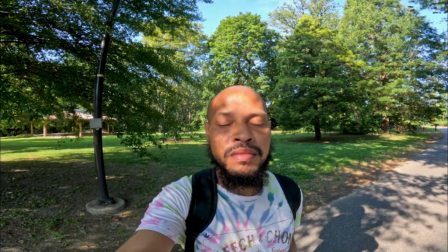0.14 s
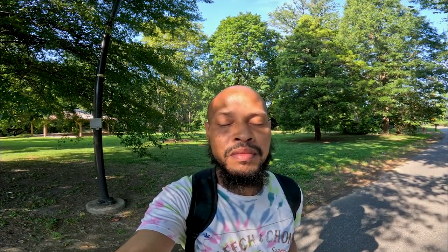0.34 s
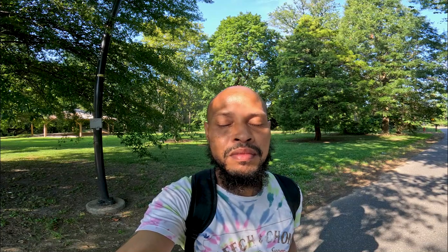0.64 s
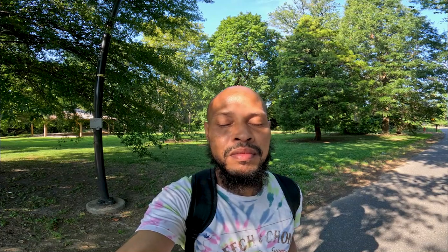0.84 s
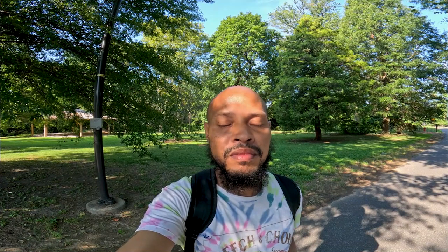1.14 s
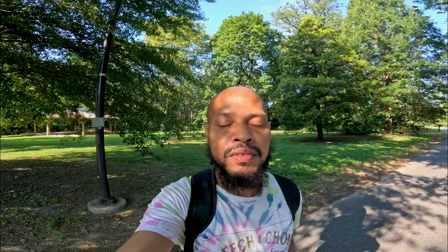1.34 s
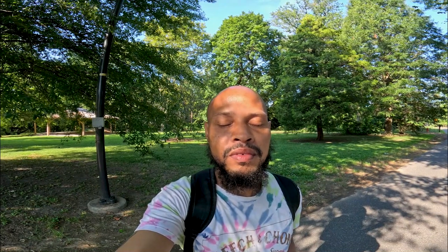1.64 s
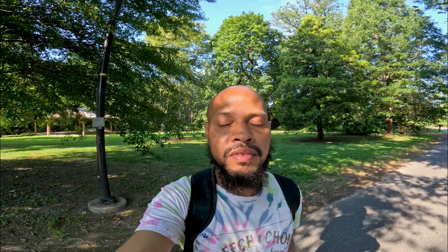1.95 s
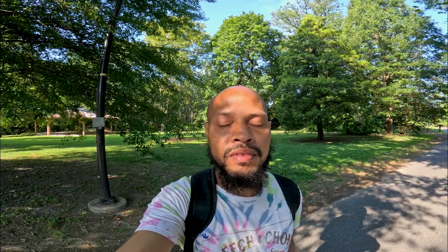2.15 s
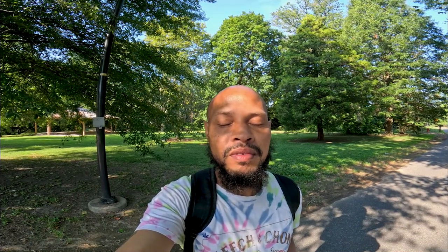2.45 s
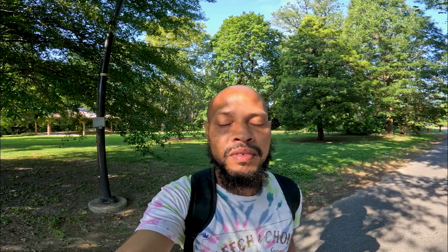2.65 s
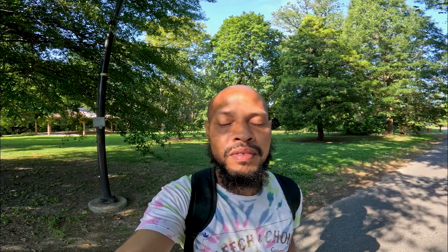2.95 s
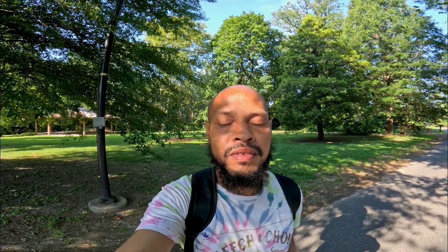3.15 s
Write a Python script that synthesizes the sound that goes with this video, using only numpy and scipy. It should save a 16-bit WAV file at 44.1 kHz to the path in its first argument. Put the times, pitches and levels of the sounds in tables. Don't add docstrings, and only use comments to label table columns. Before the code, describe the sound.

Cicadas buzz in a dense, steady high-pitched chorus over a faint low rumble of distant traffic.

```python
import sys
import numpy as np
from scipy import signal
from scipy.fft import rfft, irfft
from scipy.io import wavfile
from scipy.ndimage import uniform_filter1d

SR = 44100
rng = np.random.default_rng(int(sys.argv[2]) if len(sys.argv) > 2 else 0)


def generate_wav(signal):
    frames = np.transpose(np.atleast_2d(signal))
    scaled = np.clip(frames, -1, 1) * 32767
    pcm = np.round(scaled).astype(np.int16)
    wavfile.write(sys.argv[1], SR, pcm)


def voltage_ratio(decibels):
    exponent = np.asarray(decibels, float) / 20
    return 10 ** exponent


N = 145530


def evened(x):
    return x / np.sqrt(np.mean(x ** 2) + 1e-20)


def read(points, hz):
    f, value = np.transpose(points)
    return np.interp(np.log(hz + 1), np.log(f + 1), value)


def wander(top_hz, count):
    hz = np.fft.rfftfreq(N, 1 / SR)
    spectrum = rfft(rng.standard_normal((count, N)))
    spectrum = spectrum * (hz > 0) / (1 + (hz / top_hz) ** 4)
    return evened(irfft(spectrum, N))


def resonate(x, hz, width_hz):
    turn = np.exp(2j * np.pi * hz * np.arange(len(x)) / SR)
    r = np.exp(-np.pi * width_hz / SR)
    return 2 * (turn * signal.lfilter([1 - r], [1, -r], x / turn)).real


def ports(a, b):
    # hz, likeness (0 to 1)
    likeness = [(60, 1), (290, 0.98), (640, 0.51), (1410, 0.66), (3100, 0.77), (7500, 0.84), (11000, 0.86),
                (12800, 0.36)]
    # hz, left_lead_rad
    left_lead = [(0, -0.85), (690, 0.5), (1890, -0.4), (3010, -0.67), (7240, -0.077), (15200, -0.0)]
    # hz, left_over_right_db
    balance = [(60, -2), (110, -0.5), (200, -2.5), (380, -2.0), (700, -0.5), (1290, 0.0), (2380, 1.0),
               (4400, -1), (8120, -0.5), (15000, 5)]
    hz = np.fft.rfftfreq(N, 1 / SR)
    same = np.clip(read(likeness, hz), 0, 1)
    half = voltage_ratio(read(balance, hz) / 2) * np.exp(.5j * read(left_lead, hz))
    shared = np.sqrt((1 + same) / 2) * rfft(a)
    apart = np.sqrt((1 - same) / 2) * rfft(b)
    return irfft(np.array([(shared + apart) * half, (shared - apart) / half]), N)


def hiss(colour, patchy_db, patch_hz, patch_s):
    z = signal.stft(rng.standard_normal((2, N)), SR, nperseg=512, noverlap=384)[2]
    patches = rng.standard_normal(z.shape[1:])
    patches = uniform_filter1d(patches, max(1, int(patch_hz * 512 / SR)), 0)
    patches = evened(uniform_filter1d(patches, max(1, int(patch_s * SR / 128)), 1))
    x = signal.istft(z * voltage_ratio(patchy_db * patches), SR, nperseg=512, noverlap=384)[1][:, :N]
    hz = np.fft.rfftfreq(N, 1 / SR)
    octaves_below = np.log2(colour[0][0] / (hz + 1))
    octaves_above = np.log2((hz + 1) / colour[-1][0])
    beyond = np.maximum(np.maximum(octaves_below, octaves_above), 0)
    gain = voltage_ratio(read(colour, hz) - 37 * beyond)
    return evened(ports(*irfft(rfft(x) * gain, N)))


def far_chorus():
    # hz, level_db (per Hz)
    colour = [(1850, -25), (2250, -11.5), (2790, -5.5), (3660, 0), (4450, -3), (5460, .5), (7410, -9),
              (8700, -31.5)]
    return voltage_ratio(2.5) * hiss(colour, patchy_db=1.18, patch_hz=270, patch_s=.03)


def leaves():
    t60_s, echoes_db = 0.06, 0.5
    tail = np.arange(8000) / SR
    taps = rng.standard_normal((2, 8000)) * (rng.random((2, 8000)) < .05)
    taps = taps * voltage_ratio(-60 * tail / t60_s)
    taps = voltage_ratio(echoes_db) * taps / np.linalg.norm(taps, axis=1, keepdims=True)
    taps[:, 0] = [1, 0]
    return taps / np.linalg.norm(taps, axis=1, keepdims=True)


def singers():
    # ring_hz, clicks_per_s, throbs_per_s, throb_top_s, level_db
    voices = [
        (2750, 155, 12.6, .87, -16),
        (3300, 190, 11.5, .24, -14),
        (3780, 215, 11.5, 1.66, -12),
        (4900, 260, 12.2, 3.0, -15),
        (5300, 200, 12.2, .7, -10),
        (5850, 394, 12.2, .7, -10.5),
        (6550, 290, 11.3, 1.54, -15),
        (7500, 330, 11.2, 1.81, -21),
    ]
    # level_db of two, of three
    bursts = [5, 5]
    ring_width_hz, jitter_share, uneven_db = 280, .08, 2
    throb_db, drift_db = 12, .9
    t, out = np.arange(N) / SR, np.zeros((2, N))
    drift = wander(0.95, count=len(voices))
    jitter = wander(300, count=len(voices))
    for k, (ring_hz, rate, throb, top_s, level_db) in enumerate(voices):
        phase = np.cumsum(rate * (1 + jitter_share * jitter[k])) / SR
        clicks = np.diff(np.floor(phase), prepend=0)
        clicks = clicks * voltage_ratio(uneven_db * rng.standard_normal(N))
        body = resonate(clicks, ring_hz, ring_width_hz)
        body = resonate(body, ring_hz, 2.8 * ring_width_hz)
        turn = 2 * np.pi * throb * (t - top_s)
        bursts_db = bursts[0] * np.sin(2 * turn) + bursts[1] * np.cos(3 * turn)
        swell = voltage_ratio((throb_db * np.cos(turn) + bursts_db) / 2 + drift_db * drift[k])
        song = evened(body * swell)
        out += voltage_ratio(level_db) * signal.oaconvolve(song[None], leaves(), axes=1)[:, :N]
    return ports(*out)


def cicadas():
    # time_s, level_db, low_voices_db, left_over_right_db
    swell = [
        (0.0, -38.5, -1.5, 0.5),
        (0.44, -38, -2.5, 0.5),
        (1.1, -38, -1.5, 0.0),
        (1.64, -38, -3.5, -2.0),
        (1.67, -38, -3, -0.5),
        (1.7, -38.5, -2, -1.0),
        (2.31, -38.5, -3.5, -1),
        (3.3, -40, -2.5, 0),
    ]
    # hz, level_db (per Hz)
    sheen_colour = [(4600, -25), (7800, -4), (8600, -6.5), (10900, -15.5), (12400, -21.5), (14000, -28),
                    (14900, -40), (15700, -44)]
    low_edge_hz = 5100
    s, level_db, low_db, pan_db = np.transpose(swell)
    t = np.arange(N) / SR
    x = far_chorus() + singers()
    sheen_db = -18.5 + 1.3 * np.interp(t, s, level_db - level_db.mean())
    x = x + voltage_ratio(sheen_db) * hiss(sheen_colour, patchy_db=0.8, patch_hz=2500, patch_s=.03)
    hz = np.fft.rfftfreq(N, 1 / SR)
    low = irfft(rfft(x) / (1 + (hz / low_edge_hz) ** 6), N)
    x = x - low + low * voltage_ratio(np.interp(t, s, low_db - low_db.mean()))
    pan = np.interp(t, s, pan_db - pan_db.mean()) / 2
    return x * voltage_ratio(np.interp(t, s, level_db) + np.array([pan, -pan]))


def engine_drones():
    # pitch_hz, width_hz, level_db
    engines = [
        (40.8, 6.8, -49),
        (75.7, 5.8, -48.5),
        (102.7, 18, -58),
    ]
    drones = np.zeros((2, N))
    for hz, width_hz, db in engines:
        drones[0] += voltage_ratio(db) * evened(resonate(rng.standard_normal(N), hz, width_hz))
    return ports(*drones)


def tyre_moans():
    # time_s, pitch_hz, level_db
    puffs = [
        (.45, 492, -72),
        (1.12, 970, -64),
        (1.75, 510, -62),
        (2.15, 515, -62.5),
        (2.5, 804, -67),
        (3.0, 500, -64.5),
    ]
    puff_s, width_hz = .06, 70
    t, moans = np.arange(N) / SR, np.zeros((2, N))
    for s, hz, db in puffs:
        shape = voltage_ratio(db) * np.exp(-((t - s) / puff_s) ** 2)
        moan = [resonate(noise, hz, width_hz) for noise in rng.standard_normal((2, N))]
        moans += shape * evened(np.array(moan))
    return ports(*moans)


def traffic():
    # hz, level_db (per Hz)
    rumble_colour = [(5, -22), (16, -2.5), (40, -2.5), (85, -4), (145, -13), (250, -17), (336, -26),
                     (520, -63)]
    # hz, level_db (per Hz)
    wash_colour = [(190, -47), (330, -4.5), (455, -2.5), (520, -1.5), (855, -8), (961, -3.5), (1800, -8.5),
                   (2600, -12)]
    # time_s, level_db
    passing = [
        (0, -3.5),
        (.4, 1),
        (1, 1),
        (1.4, 0.5),
        (2, 0.1),
        (2.6, 0.4),
        (3.3, -1.5),
    ]
    rumble = voltage_ratio(-42) * hiss(rumble_colour, patchy_db=1.6, patch_hz=100, patch_s=0.24)
    wash = voltage_ratio(-60.5) * hiss(wash_colour, patchy_db=1.5, patch_hz=250, patch_s=0.11)
    s, level_db = np.transpose(passing)
    swell = voltage_ratio(np.interp(np.arange(N) / SR, s, level_db))
    return swell * (rumble + engine_drones()) + tyre_moans() + wash


def tick():
    tick_s, level_db, pitch_hz, length_s = 1.2688, -40, 12500, .00008
    u = np.arange(N) / SR - tick_s
    return voltage_ratio(level_db) * np.exp(-(u / length_s) ** 2) * np.sin(2 * np.pi * pitch_hz * u)


def knocks():
    # start_s, pitch_hz, peak_db
    pushes = [
        (1.706, 36, -28),
        (3.28, 52, -26),
    ]
    cycles = 1.25
    t, out = np.arange(N) / SR, np.zeros(N)
    for s, hz, db in pushes:
        u = np.clip((t - s) * hz / cycles, 0, 1)
        out += voltage_ratio(db) * np.sin(np.pi * u ** .7) * np.sin(2 * np.pi * cycles * u)
    return out


def scene():
    return cicadas() + traffic() + tick() + knocks()


def band_limit(x):
    return signal.sosfilt(signal.butter(12, 15720, fs=SR, output="sos"), x)


def record(dry):
    return band_limit(dry)


dry = scene()
out = record(dry)
generate_wav(out)
```